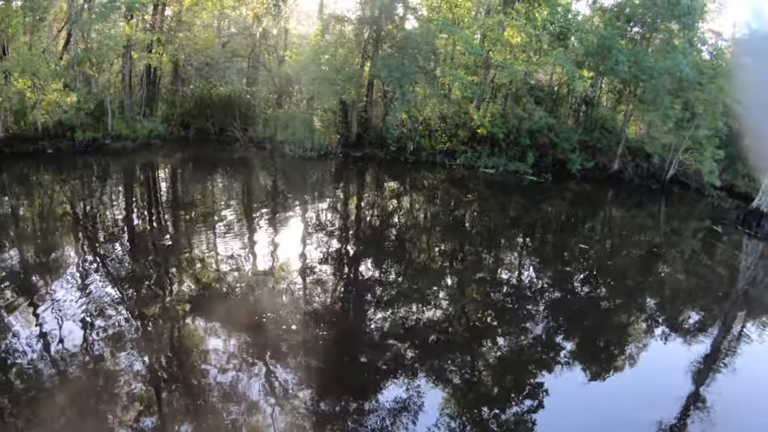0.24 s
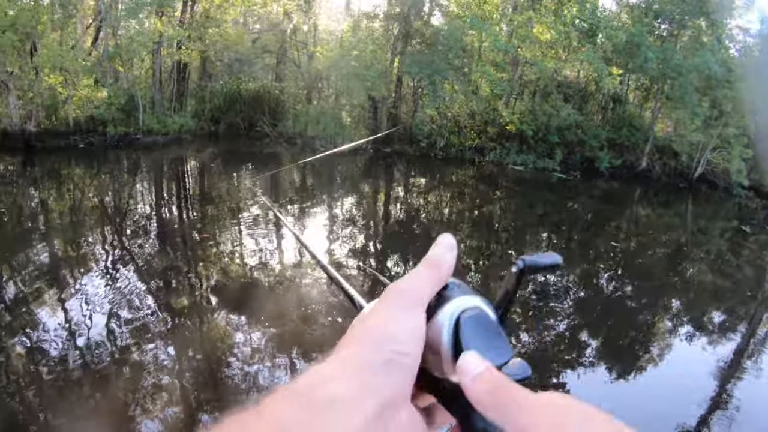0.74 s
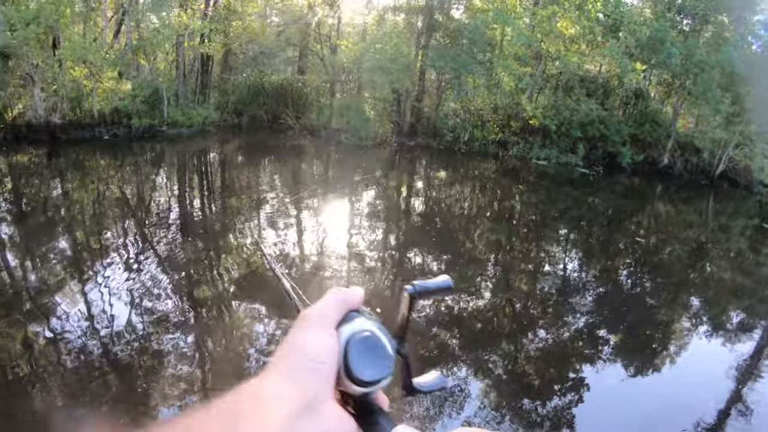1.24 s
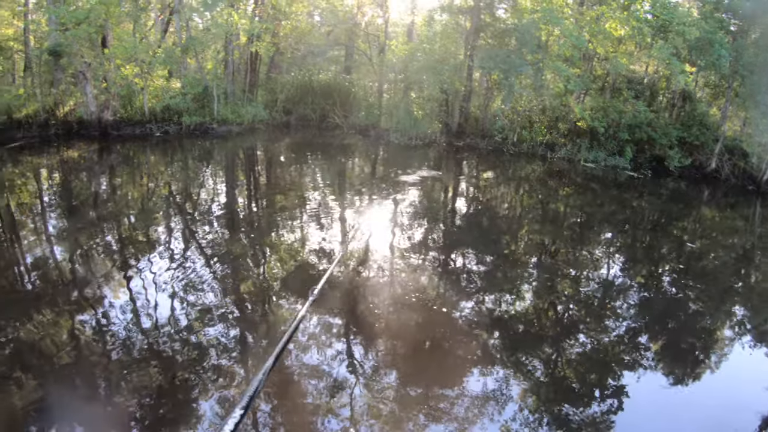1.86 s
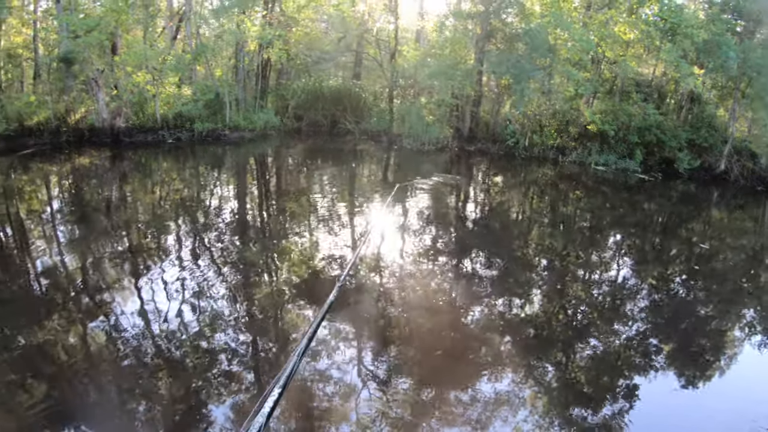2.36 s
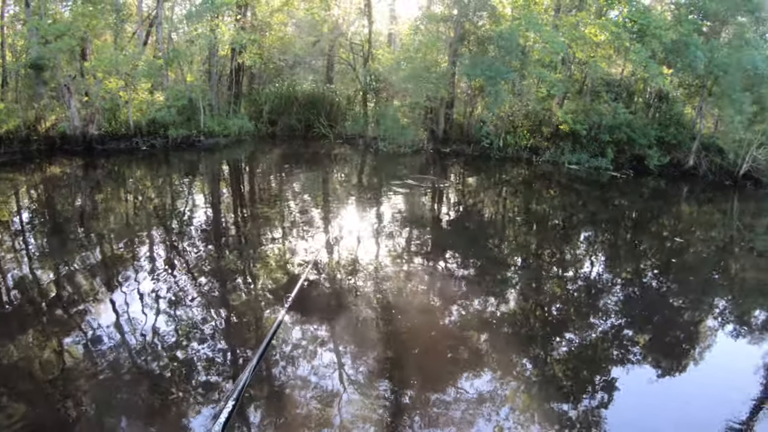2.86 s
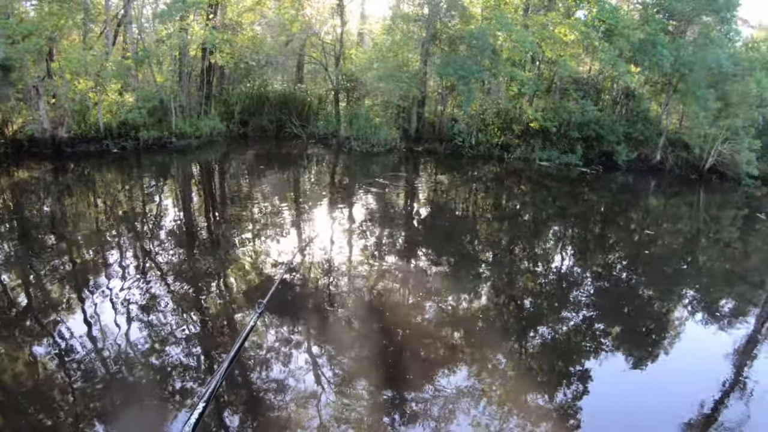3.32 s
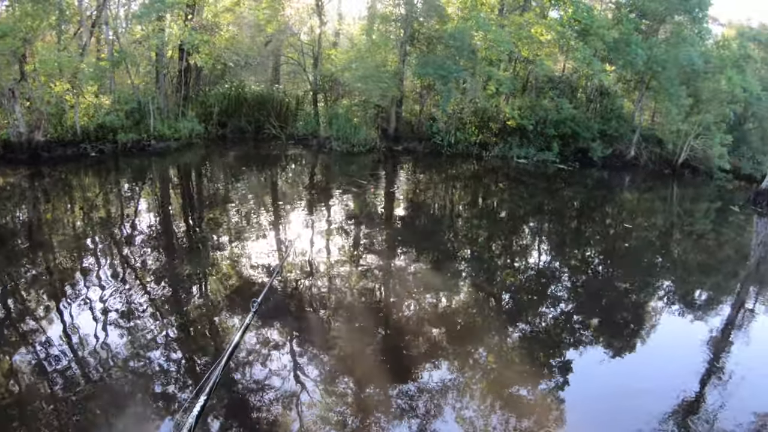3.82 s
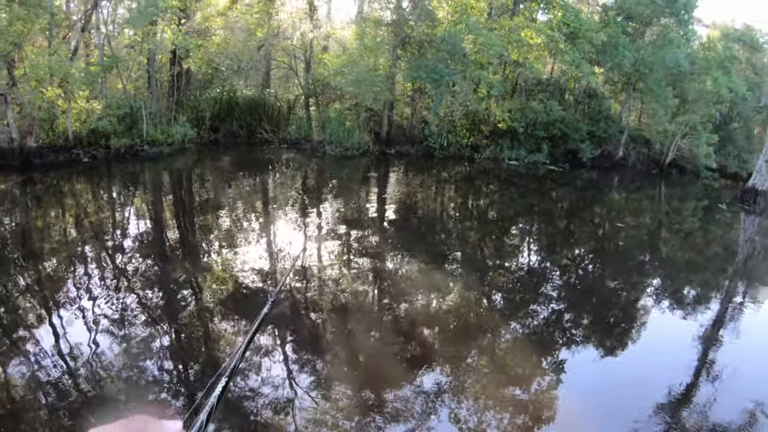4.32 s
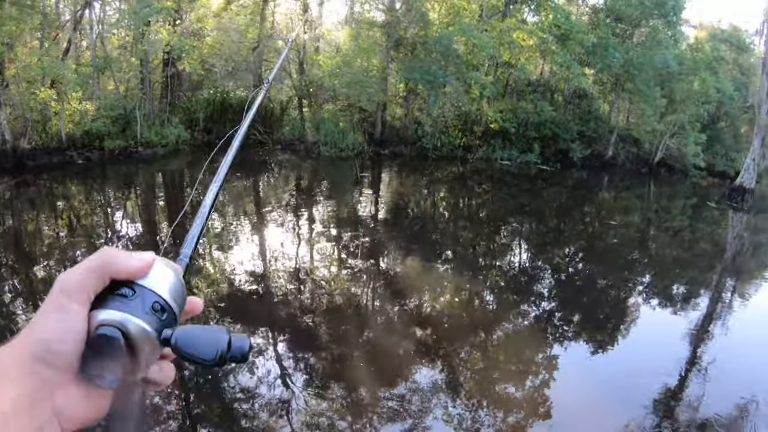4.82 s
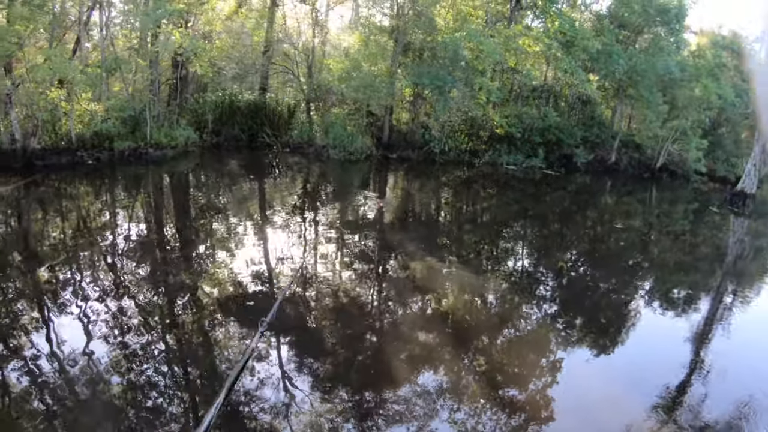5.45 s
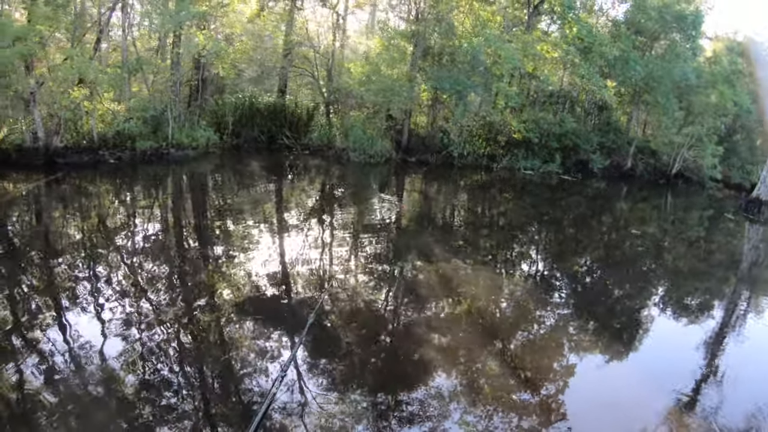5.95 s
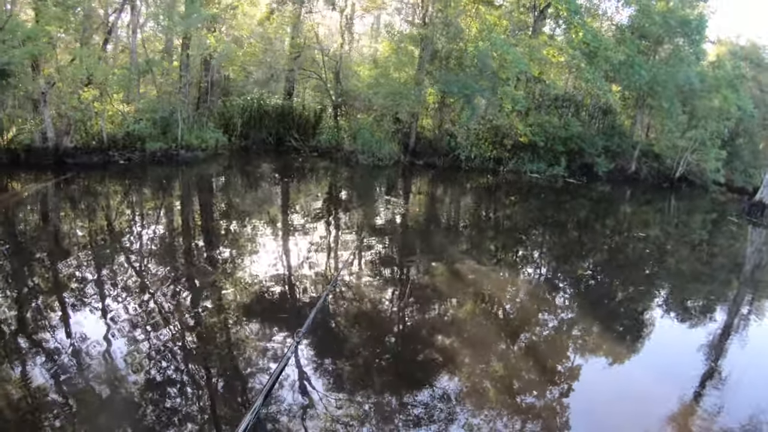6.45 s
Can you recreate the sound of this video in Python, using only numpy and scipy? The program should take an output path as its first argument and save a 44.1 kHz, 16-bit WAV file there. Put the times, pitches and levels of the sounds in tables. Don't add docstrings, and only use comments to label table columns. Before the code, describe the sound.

Outdoors on a small boat in still swamp water, low air rumble sways against the microphone above a faint fading engine drone. Reel clicks are dry and very near, small at first, peaking in two sharp snaps around two seconds. Songbirds chirp quickly with light woodland echo, insects shimmer high up, and soft fumbling, a few clicks and a final deep bump follow.

```python
import sys
import numpy as np
from scipy import signal
from scipy.fft import rfft, irfft, next_fast_len
from scipy.io import wavfile
from scipy.ndimage import uniform_filter1d

SR = 44100
rng = np.random.default_rng(int(sys.argv[2]) if len(sys.argv) > 2 else 0)


def makeup_ratio(level_db):
    decades = np.asarray(level_db, float) / 20
    return 10 ** decades


def wav_out(sig):
    wavfile.write(sys.argv[1], SR, np.round(np.clip(np.atleast_2d(sig).T, -1, 1) * 32767).astype(np.int16))


N = 294676


def evened(x):
    return x / np.sqrt(np.mean(x ** 2) + 1e-20)


def curve(rows):
    return np.interp(np.arange(N) / SR, *np.transpose(rows))


def add(mix, s, sound):
    part = mix[max(round(s * SR), 0):][:len(sound)]
    part += sound[:len(part)]


def coloured(points, count=N):
    size = next_fast_len(count, True)
    bin_hz = np.fft.rfftfreq(size, 1 / SR)
    hz, db = np.transpose(points)
    gain = makeup_ratio(np.interp(np.log(bin_hz + 0.16), np.log(hz), db, left=-150, right=-150))
    spectrum = rfft(rng.standard_normal(size)) * gain
    return evened(irfft(spectrum, size)[:count])


def wander(lo_hz, hi_hz):
    return coloured([(lo_hz, 0), (hi_hz, -6)])


# t/s, level/dB
SWAY = [(0.0, -17.5), (0.35, -14), (0.5, -26.5), (0.97, -14.5), (1.15, -32), (1.36, -18), (1.69, -17.5),
        (1.77, -12), (2.57, -22.5), (4.39, -21), (4.48, -33), (4.63, -14), (4.99, -11.5), (5.54, -30),
        (5.67, -15.5), (6.16, -16.5), (6.31, -36.5), (6.68, -26.5)]
# f/Hz, level/dB per Hz
RUMBLE = [(18, -36), (26, 8), (33, -13.5), (42, -2), (65, -3.5), (85, -4.5), (150, -13.5), (195, -10.5),
          (260, -15.5), (330, -24.5), (380, -30), (600, -28.5)]
# f/Hz, level/dB per Hz
AIR = [(180, -31), (300, 3), (376, -7.5), (410, -12), (541, -10.5), (583, -9.5), (3540, -18), (4220, -16),
       (6000, -22.5), (7800, -51.5), (13200, -120)]
# f/Hz, level/dB per Hz
CHORUS = [(3240, -47), (5500, -20), (5670, -19.5), (6290, -5), (6820, -6), (7390, -1.5), (7790, -6),
          (8080, -12), (8300, -13), (11500, -5.5), (12300, -5), (14100, -9), (15400, -18), (16000, 4)]


def background():
    gusts = coloured([(1.5, -14), (4, -3), (7, 0), (11, -5), (15, -17), (21, -42)])
    sway = makeup_ratio(uniform_filter1d(curve(SWAY), size=4000)) * gusts
    rumble = makeup_ratio(-40 - 0.28 * np.arange(N) / SR) * coloured(RUMBLE)
    air = makeup_ratio(-55.5 + .5 * wander(.3, 6)) * coloured(AIR)
    swell_db = .5 * wander(0.48, 0.66)
    throb_db = 0.66 * wander(5, 34)
    chorus = makeup_ratio(-47.5 + swell_db + throb_db) * coloured(CHORUS)
    cricket_band = coloured([(7200, -22.0), (7480, 0), (7560, 6.0), (7700, -11), (7900, -16.0)])
    crickets = makeup_ratio(-58.5 + 1.86 * wander(1.7, 58)) * cricket_band
    return sway + rumble + air + chorus + crickets


# t/s, f/Hz
ENGINE = [(0, 42.5), (2, 41.9), (4.5, 41.35), (6.68, 40.8)]
# multiple of the firing rate, level/dB
ENGINE_ORDERS = [(2, -49.5), (3, -51.5), (4, -53), (4.5, -65), (6, -57.5), (7, -67.5), (8, -63),
                 (10, -63.5)]


def engine():
    turns = np.cumsum(curve(ENGINE) * (1 + 0.005 * wander(0.21, 7.1))) / SR
    leaving_db = 2.5 - 0.77 * np.arange(N) / SR
    out = np.zeros(N)
    for order, db in ENGINE_ORDERS:
        level = np.sqrt(2) * makeup_ratio(db + leaving_db + 2.54 * wander(0.22, 5))
        cycles = order * turns + .22 * wander(.3, 5.1)
        out += level * np.sin(2 * np.pi * cycles)
    return out


def echoes(x, t60):
    t = np.arange(SR // 2) / SR
    returns = rng.standard_normal(len(t)) * (rng.random(len(t)) < .2)
    trunks = returns * makeup_ratio(-60 * t / t60) * np.minimum(t / .012, 1)
    return signal.fftconvolve(x, trunks / np.linalg.norm(trunks))[:N]


# offset t/s, duration t/s, start, middle and end f/Hz, level/dB
WARBLE = [
    (0, .027, 4450, 4630, 4700, 2.5),
    (.027, 0.0274, 4840, 4250, 4000, 5.5),
    (.06, .1, 3900, 4000, 3950, -7),
]
# t/s, level/dB, pitch ratio
WARBLES = [(0.153, -55, 0.97), (1.244, -57, 0.95), (1.804, -54.5, 0.95), (6.485, -60, 0.96)]
# offset t/s, duration t/s, start, middle and end f/Hz, level/dB
SWEET = [
    (-.02, .014, 4920, 4860, 4570, -6.5),
    (0, 0.016, 3670, 4410, 5330, 0),
    (.015, .022, 4750, 4950, 5200, -4),
]
# t/s, level/dB, pitch ratio
SWEETS = [(3.732, -47, 0.98), (4.018, -50, 0.97), (4.313, -49, 1.0), (4.61, -50.5, 1.0),
          (4.912, -53.5, 0.97), (5.222, -51, 0.97)]
# offset t/s, duration t/s, start, middle and end f/Hz, level/dB
TEETER = [
    (0, .11, 3010, 2980, 2930, 0),
    (.11, .14, 2740, 2735, 2710, -1),
]
# t/s, level/dB, pitch ratio
TEETERS = [(3.6, -67, 1), (3.815, -61, 1), (4.145, -62, 1), (4.38, -64, 1), (4.7, -65, 1), (4.99, -62, .99),
           (5.3, -61, 1), (5.63, -62, .99)]
# t/s, top f/Hz, scoop f/Hz, level/dB
CHIPS = [(.06, 3800, 700, -55), (.115, 3900, 650, -53), (.131, 3300, 350, -55), (.415, 3410, 10, -52.5),
         (.69, 3740, 460, -53), (.74, 3780, 60, -51), (.86, 3690, 30, -54), (1.221, 3310, 330, -54.5),
         (1.32, 3780, 680, -55), (1.575, 3520, 13, -59.5), (1.782, 3290, 350, -55.5),
         (2.07, 4100, 500, -52), (2.33, 3620, 10, -61), (2.695, 3520, 30, -64), (2.745, 3650, 120, -64),
         (2.82, 3600, 50, -65), (2.91, 3520, 20, -63), (2.945, 3720, 300, -61), (3.005, 3600, 10, -59),
         (3.095, 3500, 10, -64), (3.44, 5150, 2300, -52.5), (4.49, 3300, 10, -59), (4.74, 4300, 1900, -52)]
# t/s, duration t/s, f/Hz, level/dB
HELD = [(4.1, .1, 3860, -62), (4.2, 0.09, 2240, -63), (4.387, 0.11, 1640, -62.5), (4.762, .07, 4260, -60),
        (4.8, .06, 3720, -69), (6.8, .2, 3170, -62), (3.1, 0.122, 3600, -65)]


def birds():
    notes = []
    for s, hz, scoop, db in CHIPS:
        notes.append((s, 0.0222, hz - scoop, hz - 0.14 * scoop, hz - 0.091 * scoop, db))
    for s, length_s, hz, db in HELD:
        notes.append((s, length_s, hz, hz, hz, db))
    for phrase, times in ((WARBLE, WARBLES), (SWEET, SWEETS), (TEETER, TEETERS)):
        for s, db, pitch in times:
            for offset, length_s, start, middle, end, note_db in phrase:
                notes.append((s + offset, length_s, start * pitch, middle * pitch, end * pitch, db + note_db))
    near, far = np.zeros((2, N))
    for s, length_s, start, middle, end, db in notes:
        u = np.linspace(0, 1, round(length_s * SR))
        hz = np.polyval(np.polyfit([0, .5, 1], [start, middle, end], 2), u)
        tone = np.sin(2 * np.pi * np.cumsum(hz) / SR)
        whistle = np.sqrt(2) * makeup_ratio(db) * tone * signal.windows.tukey(len(u), .5)
        add(far if length_s > .04 else near, s, whistle)
    far = far * makeup_ratio(4.2 * wander(20, 200) - 5)
    shimmer = makeup_ratio(3.5 * wander(30, 250) - 1.5)
    reflected = makeup_ratio(-3.0) * echoes(near, 0.72) + makeup_ratio(0.2) * echoes(far, 0.66)
    return near + far + shimmer * reflected


# t/s, peak level/dB, f/Hz
BUMPS = [(0.561, -27, 45), (0.756, -30, 78), (1.335, -15, 33), (1.63, -25.5, 41), (1.734, -24, 67),
         (3.379, -34, 51), (4.138, -22, 82), (4.86, -41, 34), (6.645, -4.5, 5.3)]


def hull():
    out = np.zeros(N)
    for s, db, hz in BUMPS:
        cycles = np.arange(SR // 5) / SR * hz
        envelope = 3 * cycles * np.exp(-1.8 * cycles)
        add(out, s, makeup_ratio(db) * np.sin(2 * np.pi * cycles) * envelope)
    return out


# t/s, duration t/s, centre f/Hz,
# width/octaves, level/dB
RUSTLES = [(0.557, 0.1, 4500, 2.1, -47.5), (0.561, 0.013, 9500, 0.21, -36), (0.788, 0.28, 3600, 0.32, -55),
           (0.68, 0.36, 1590, 0.93, -54), (0.739, 0.22, 5630, 0.33, -56), (1.084, 0.033, 1490, 0.87, -60),
           (2.105, 0.028, 1820, 1.7, -37), (2.161, 0.011, 2000, 1, -20.5), (2.182, 0.07, 1040, 1.1, -44.5),
           (3.531, 0.1, 2920, 0.68, -57), (3.753, 0.035, 1150, 1.3, -47), (4.066, 0.26, 3100, 0.86, -56),
           (4.361, 0.34, 2870, 0.91, -56), (4.733, 0.35, 2500, 1.3, -54.5), (5.534, 0.026, 3200, 1.5, -46),
           (5.565, 0.12, 3780, 0.46, -46), (5.58, 0.055, 1860, 0.41, -54.5),
           (5.753, 0.087, 2230, 1.5, -53.5), (6.359, 0.063, 1190, 1.7, -54)]


def hands():
    out = np.zeros(N)
    count = 2 ** 15
    for s, length_s, hz, octaves, db in RUSTLES:
        u = np.arange(count) / SR / length_s
        half, skirt = 2 ** (octaves / 2), 4 ** octaves
        band = coloured([(hz / skirt, -24), (hz / half, -3), (hz, 0), (hz * half, -3),
                         (min(hz * skirt, SR / 2), -24)], count=count)
        grain = makeup_ratio(1.2 * coloured([(8, 20.0), (120, -27)], count=count))
        envelope = np.minimum(u / .25, 1) * np.exp(-u ** 1.6)
        add(out, s, makeup_ratio(db) * evened(band * grain) * envelope)
    return out


def ring(drive, modes):
    t = np.arange(SR // 5) / SR
    body = np.zeros(len(t))
    for k, (hz, db, t60) in enumerate(modes):
        decay = makeup_ratio(db - 60 * t / max(t60, .004))
        body += (-1) ** k * decay * np.sin(2 * np.pi * hz * t)
    sound = signal.fftconvolve(drive, body)[:len(t)]
    return sound / abs(sound).max()


def chatter(length_s, first=3):
    t = np.arange(900) / SR
    bounces = rng.standard_normal(len(t)) * (rng.random(len(t)) < .14)
    bounces[0] = first
    return bounces * np.exp(-(t / max(length_s, .0005)) ** 3)


def housing(low_hz, top_hz):
    hz = np.geomspace(380, 14500, 30) * rng.uniform(0.9, 1.04, 30)
    octaves_outside = np.maximum(np.log2(hz / top_hz), 0) + np.maximum(np.log2(low_hz / hz), 0)
    level_db = 2.5 * rng.standard_normal(30) - 30 * octaves_outside
    t60 = .014 * (1500 / hz) ** .5
    return list(zip(hz, level_db, t60))


# t/s, peak level/dB, ringing f/Hz of the part struck
PINGS = [(.803, -35, 1630), (.829, -42, 1370), (1.284, -37, 1240), (1.325, -44, 1144), (1.57, -54, 2320),
         (1.745, -48, 1576), (2.169, -21, 1560), (2.245, -51, 1580), (2.268, -47, 1520), (4.85, -41, 1495),
         (4.862, -25.5, 1554)]
CLACKS = [(.012, -29.5, 1620), (.022, -32.5, 886), (.311, -31.5, 1630), (.3815, -16.5, 1577),
          (.566, -48, 1180), (.584, -41, 1640), (.885, -43, 835), (.908, -38.5, 820), (1.2945, -27.5, 656),
          (2.027, -42, 1660), (2.036, -39, 1410), (2.304, -42, 1550), (4.566, -40, 1440),
          (4.769, -37, 1160), (4.899, -43, 850), (5.542, -37, 2020)]
TICKS = [(.564, -28, 8000), (.612, -37, 4500), (.72, -39, 5300), (.785, -43, 3790), (1.296, -39, 3240),
         (2.089, -30, 5050), (2.093, -29, 4800), (2.102, -33, 1170), (2.155, -23, 1210), (2.178, -30, 1000),
         (2.188, -34, 1300), (5.5275, -18, 4350), (5.539, -31, 3830), (6.547, -37, 3980)]
KNOCKS = [(.305, -29.5, 810), (.386, -26, 1700), (5.5298, -23.5, 1800), (2.162, -13, 9500)]
# lowest and top f as multiples of the ring, ring level/dB against the crack
PING = (1, 2.26, 12)
CLACK = (1, 2.29, 1.4)
TICK = (0.89, 1.27, -6)
KNOCK = (0.8, 7.1, -5)
# t/s, peak level/dB, lowest and top f/Hz of the crack, chatter t/s
SNAPS = [
    (2.107, -4.5, 1210, 4000, 0.0031),
    (2.1622, -0.5, 700, 5500, 0.005),
]
# f/Hz, level/dB, t60/s
SNAP_MODES = [
    [(820, -1, .04), (1545, -7, .04), (2595, 0, .022), (3050, 0, .022)],
    [(680, -6, .05), (970, -8, .03), (1340, -9, .03), (1370, -27, .15), (1920, 2, .017), (2500, -5, .02),
     (4080, -2, .014), (6590, -30, .12)],
]
# t/s, duration t/s, f/Hz, level/dB, t60/s
SPRING = (2.166, .12, 3660, -36, .45)


def reel():
    out = np.zeros(N)
    touch = 12
    for rows, (low, top, ring_db) in ((PINGS, PING), (CLACKS, CLACK), (TICKS, TICK), (KNOCKS, KNOCK)):
        for s, db, hz in rows:
            drive = chatter(0.003)
            crack = ring(drive, housing(low * hz, top * hz))
            part = ring(drive[:touch], [(hz, 0, 0.032 * (1500 / hz) ** 0.37)])
            click = crack + makeup_ratio(ring_db) * part
            add(out, s, makeup_ratio(db) * click / abs(click).max())
    for (s, db, low_hz, top_hz, length_s), modes in zip(SNAPS, SNAP_MODES):
        drive = chatter(length_s, first=1.6)
        crack = ring(drive, housing(low_hz, top_hz))
        snap = crack + makeup_ratio(2.5) * ring(drive[:touch], modes)
        add(out, s, makeup_ratio(db) * snap / abs(snap).max())
    s, length_s, hz, db, t60 = SPRING
    t = np.arange(round(length_s * SR)) / SR
    song = makeup_ratio(db - 60 * t / t60) * np.sin(2 * np.pi * hz * t)
    add(out, s, song * signal.windows.tukey(len(t), .3))
    return signal.sosfilt(signal.butter(3, 380, "highpass", fs=SR, output="sos"), out)


def scene():
    return (background() + engine() + hull() + reel() + hands() + birds())[None]


def roll_off(x):
    return signal.sosfilt(signal.butter(12, 16210, fs=SR, output="sos"), x)


def record(dry):
    taps = signal.firwin(801, 15740, window=("kaiser", 9), fs=SR)[None]
    limited = signal.oaconvolve(np.pad(dry, ((0, 0), (400, 400)), "edge"), taps, "valid")
    return roll_off(limited)


dry = scene()
out = record(dry)
wav_out(out)
```